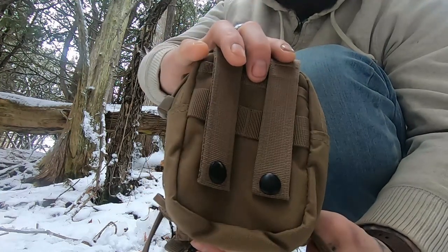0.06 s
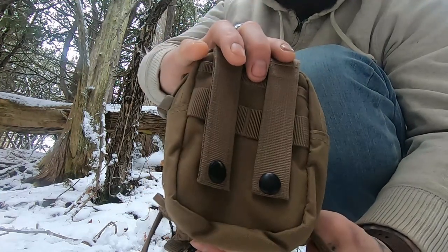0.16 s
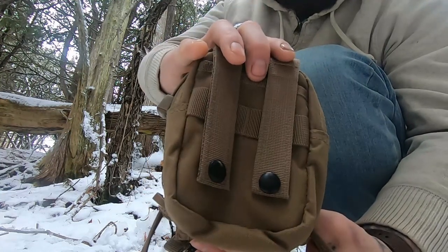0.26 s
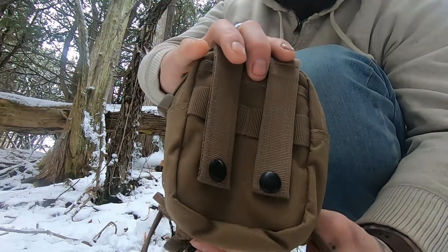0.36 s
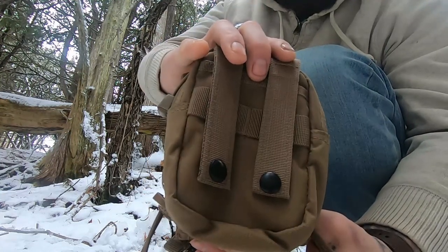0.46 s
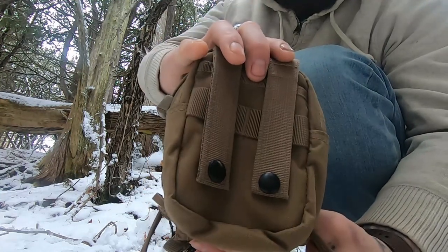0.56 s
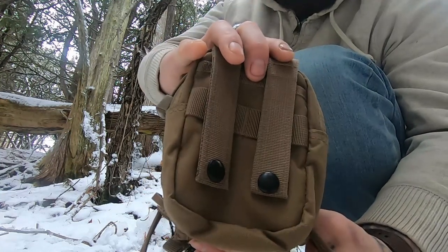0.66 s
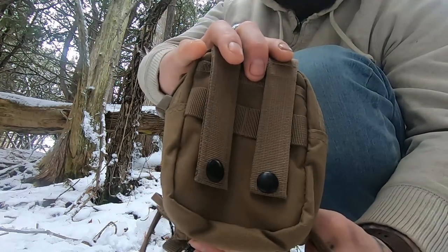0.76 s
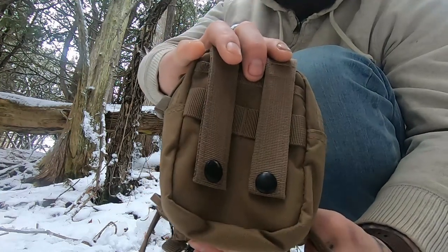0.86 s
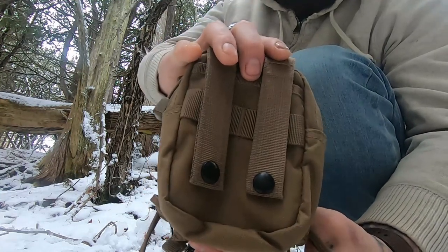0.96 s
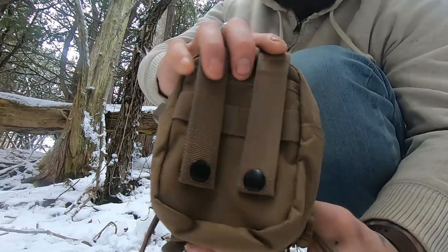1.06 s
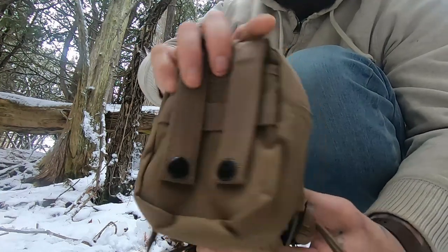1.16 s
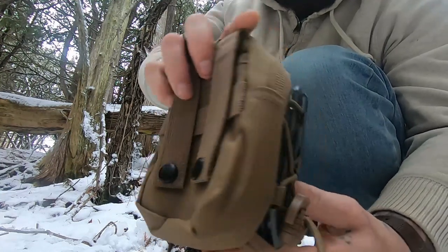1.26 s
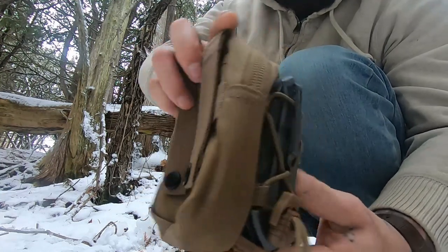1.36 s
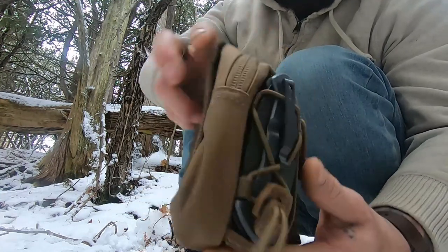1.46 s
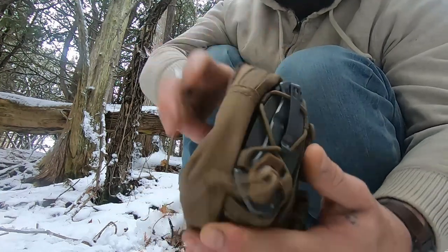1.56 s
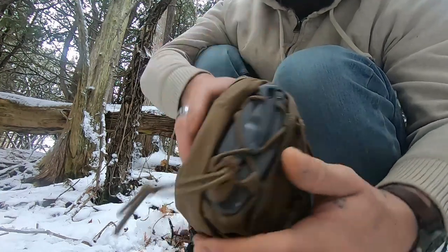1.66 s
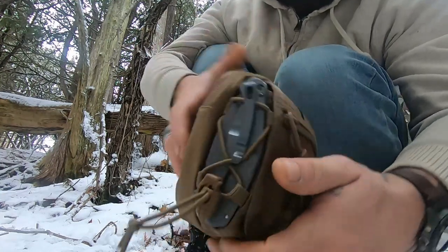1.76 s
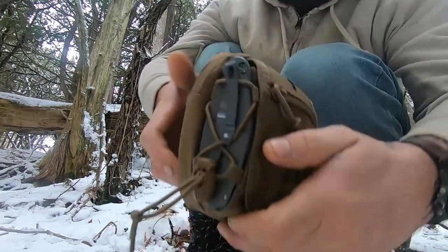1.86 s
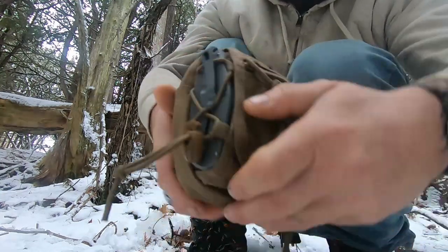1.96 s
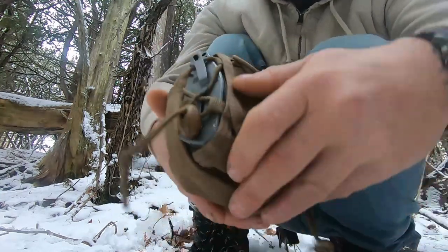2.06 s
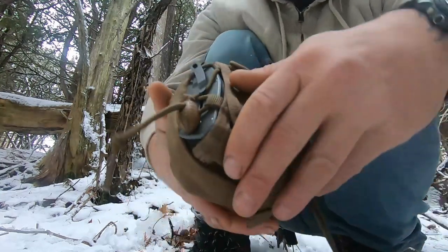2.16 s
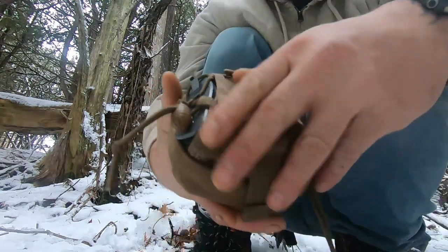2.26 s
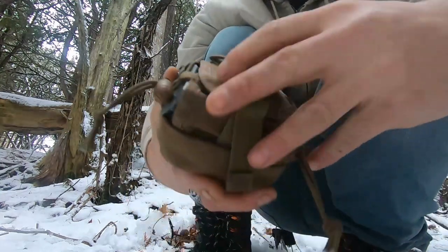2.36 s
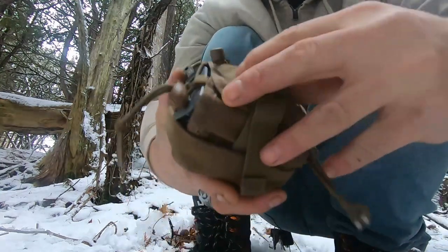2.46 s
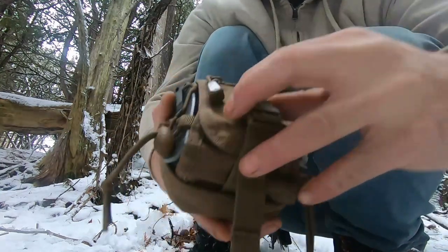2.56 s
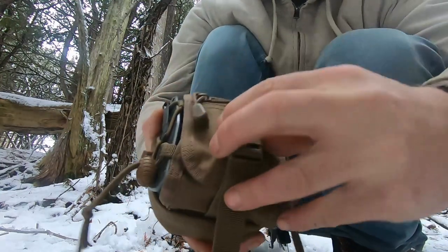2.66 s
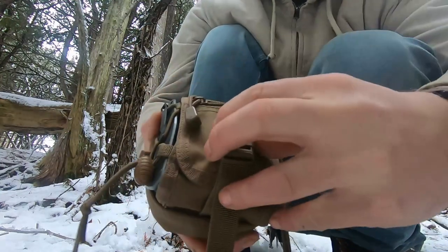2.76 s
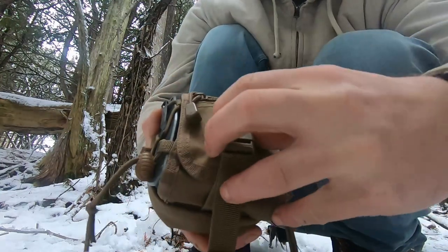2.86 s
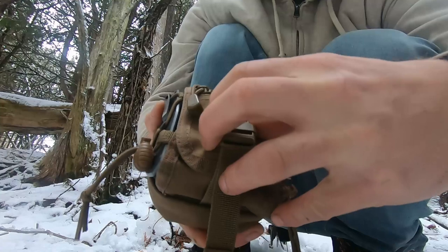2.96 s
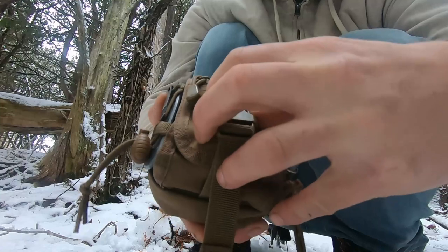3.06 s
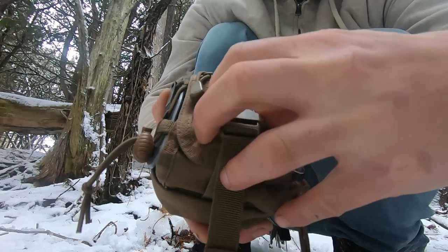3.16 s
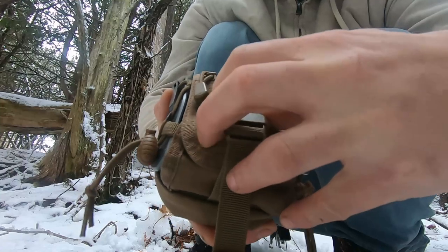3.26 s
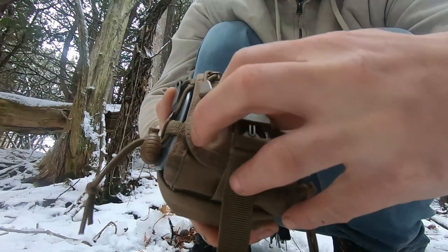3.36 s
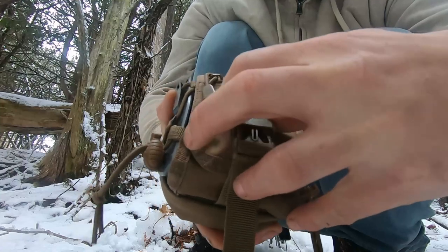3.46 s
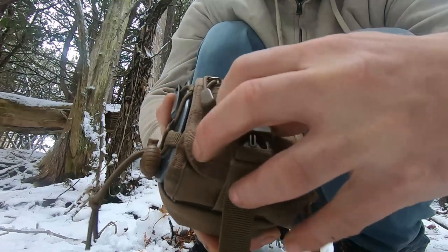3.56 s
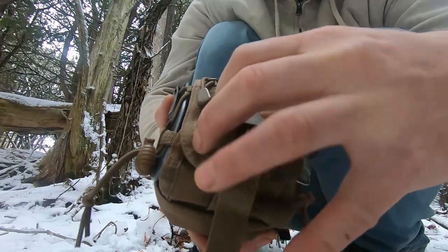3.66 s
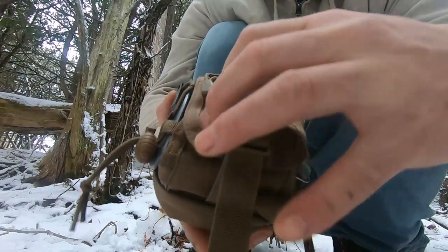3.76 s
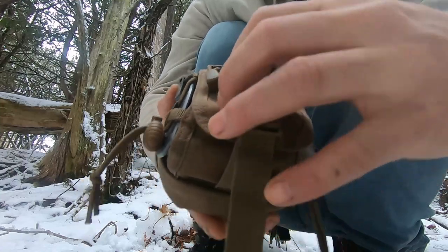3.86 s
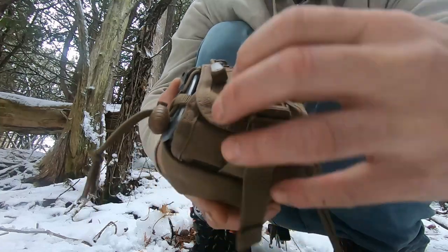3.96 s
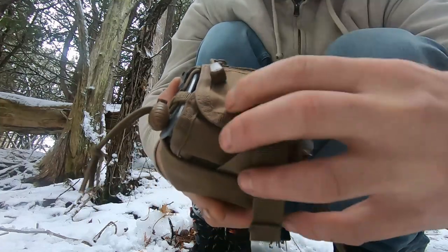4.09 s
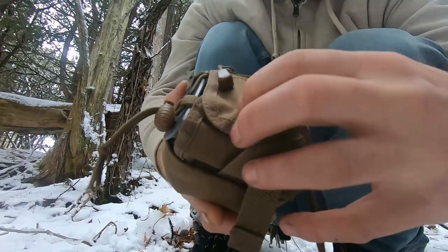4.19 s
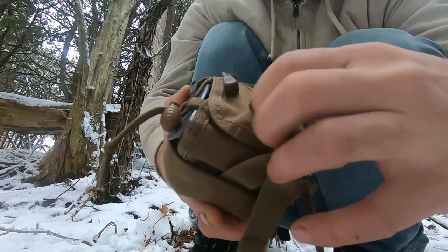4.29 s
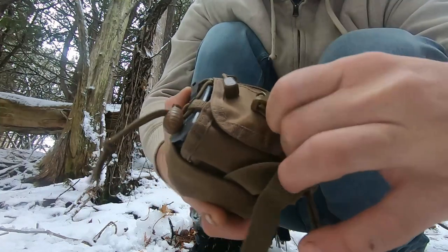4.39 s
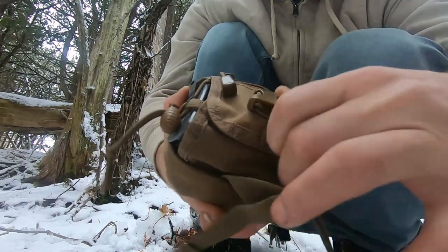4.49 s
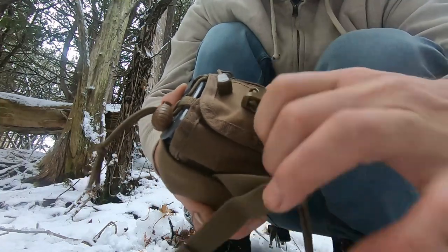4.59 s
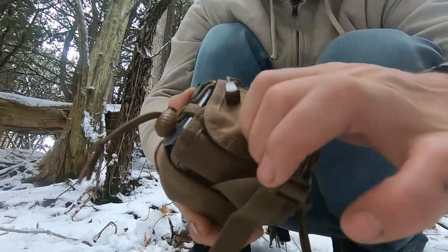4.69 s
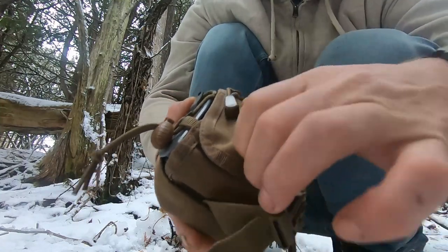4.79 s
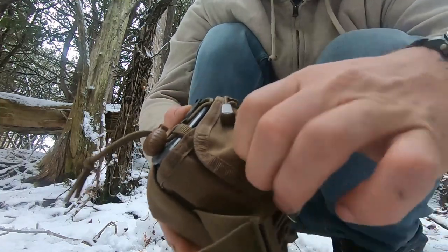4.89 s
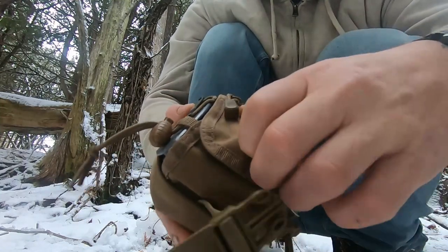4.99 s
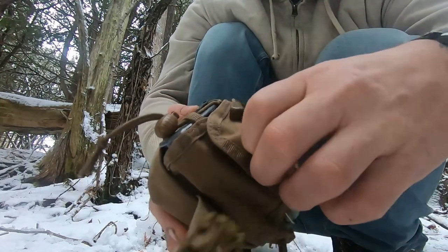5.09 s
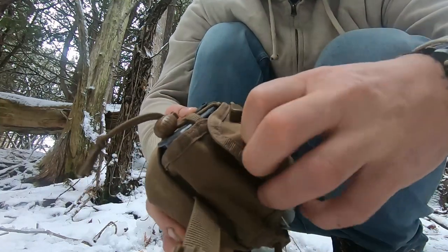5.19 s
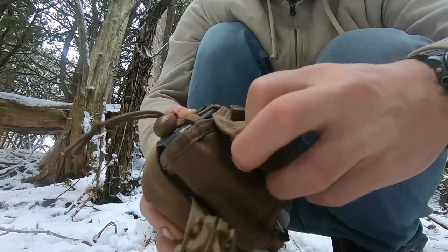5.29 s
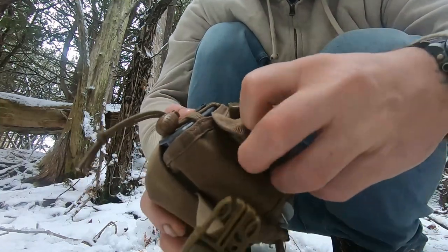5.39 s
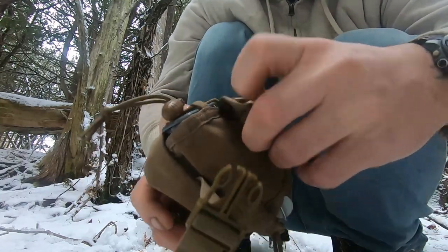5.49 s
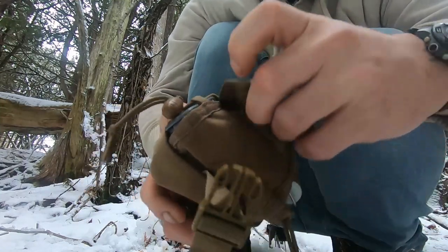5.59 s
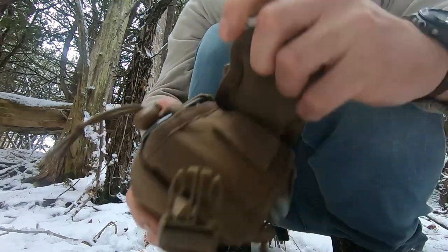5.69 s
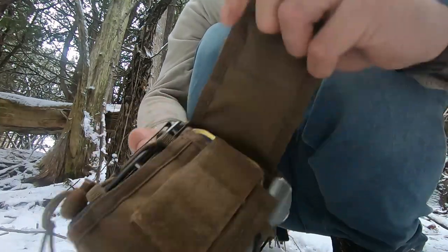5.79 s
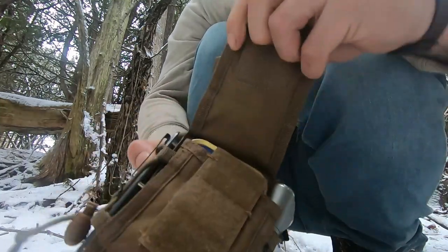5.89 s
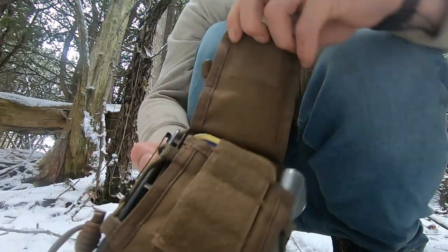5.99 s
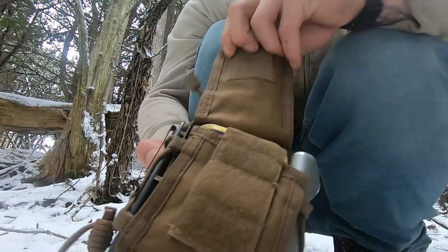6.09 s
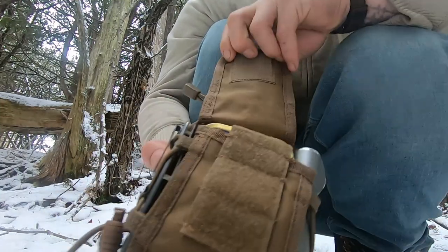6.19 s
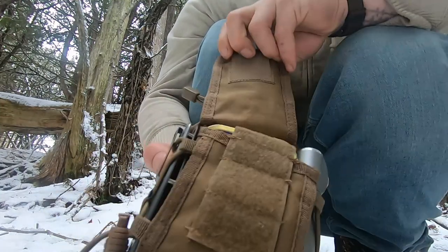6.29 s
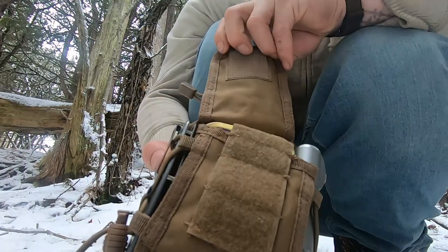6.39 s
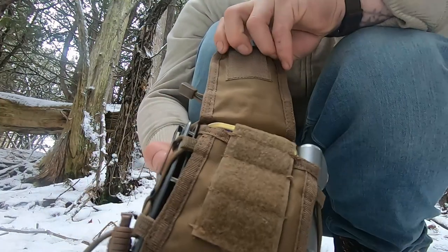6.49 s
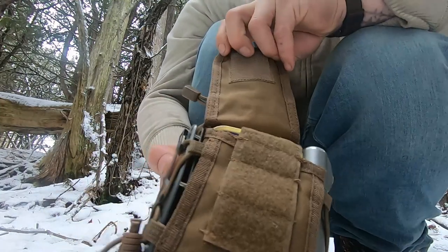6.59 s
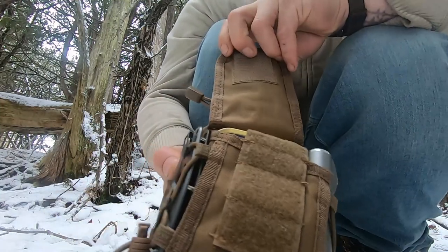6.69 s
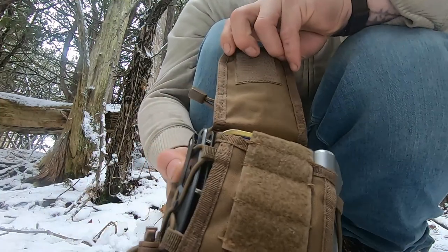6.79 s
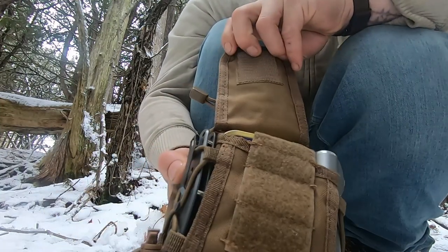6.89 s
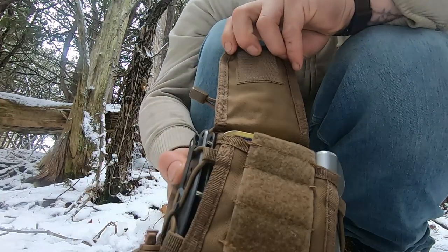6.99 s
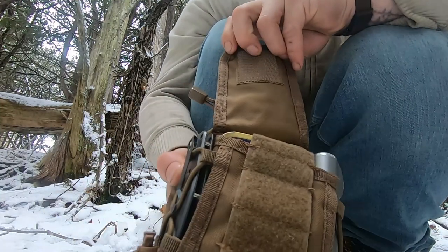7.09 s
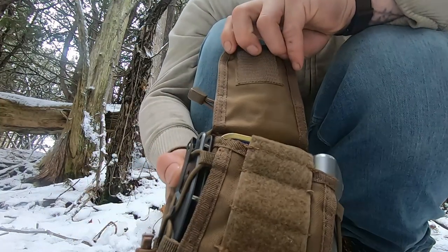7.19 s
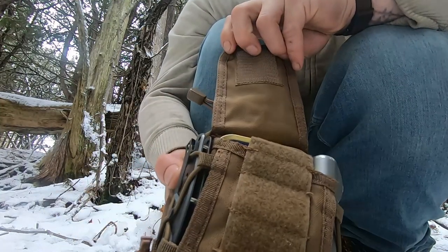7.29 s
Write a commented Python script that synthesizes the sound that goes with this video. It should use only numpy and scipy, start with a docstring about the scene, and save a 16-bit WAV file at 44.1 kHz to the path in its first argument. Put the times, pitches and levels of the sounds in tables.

```python
"""A far drone, a faint hiss and light air on the microphone are heard first, in a quiet winter wood (filtered noise).
Then a nylon belt pouch is turned over in the hands close by: its cloth swishes (grains of friction),
plastic fittings knock and a buckle snaps open (damped modes and noise bursts). A hook-and-loop flap is pulled:
single hooks pop first (short bursts), then whole rows tear in runs (dense grains through moving resonances)."""
import sys
import numpy as np
from scipy import signal
from scipy.fft import rfft, irfft, next_fast_len
from scipy.io import wavfile
from scipy.ndimage import map_coordinates

SR = 44100
rng = np.random.default_rng(int(sys.argv[2]) if len(sys.argv) > 2 else 0)


def persist_wave(psi):
    """Save psi, clipped to +-1, as 16-bit WAV."""
    counts = np.round(np.clip(psi, -1, 1) * 32767).astype(np.int16)
    wavfile.write(sys.argv[1], SR, np.atleast_2d(counts).T)


N = 323782  # length [samples]

# Spectra of cloth friction: (frequency [Hz], relative level [dB])
SWISH_SPECTRUM = [(900, -25), (1500, -5), (2000, -2), (2700, -1), (3500, 0), (4600, -9), (6000, -15.5),
                  (10000, -59)]
WEAVE_SPECTRUM = [(3000, -23), (5200, 4), (7200, 4.5), (9000, -2), (11500, -13.5), (14000, -16.5),
                  (16000, -31)]
PADDING_SPECTRUM = [(400, -25.5), (850, -2), (1100, -1.5), (1450, 1), (1900, -9), (3000, -24), (6000, -53)]
RUB_SPECTRUM = [(70, -28.5), (190, 3.5), (320, 1.5), (520, -4.5), (720, -2.5), (1200, -26), (3000, -47.5)]


def cloth():
    """Stick-slip friction: threads catch and slip under the fingers; a heavier rub also sounds the padding."""
    swish_db, weave_db, rub_db = hand_levels()
    flutter_db = 1.2 * wobble(90) + 0.7 * wobble(25)
    creases = grains(rate=90, spread_db=4)
    threads = unit(grains(rate=7000, spread_db=3) + amp(-10) * creases)
    swish = amp(swish_db + flutter_db - 1.7) * coloured(threads, SWISH_SPECTRUM)
    weave = amp(weave_db + flutter_db + 0.6) * coloured(threads, WEAVE_SPECTRUM)

    # the padding lies between swish and rub in level
    padding_db = swish_db + 0.38 * (rub_db - swish_db) - 0.8
    padding_grains = grains(rate=2500, spread_db=4.5)
    padding = amp(padding_db + flutter_db) * coloured(padding_grains, PADDING_SPECTRUM)
    rub_grains = grains(rate=660, spread_db=6.5)
    rub = amp(rub_db + flutter_db - 0.7) * coloured(rub_grains, RUB_SPECTRUM)
    return patchy(swish + weave + padding + rub, depth_db=2.2)


# Strokes of the hands over the cloth: (start [s], end [s], relative swish level [dB],
# weave hiss over swish [dB], low rub over swish [dB])
HAND_STROKES = [(1.282, 1.36, -58.5, -14.5, -16), (1.37, 1.454, -47, -13.5, -6),
                (1.475, 1.623, -46.5, -22, -20), (1.669, 1.676, -42.5, -12, -2.5),
                (1.736, 1.807, -45.5, -17, -22), (1.844, 2.235, -57.5, -11.5, -12.5),
                (2.273, 2.366, -52.5, -14, -19), (2.378, 2.458, -50.5, -11, -4.5),
                (2.497, 2.533, -42.5, -18.5, -10.5), (2.608, 2.625, -46.5, -13, -7),
                (2.675, 2.688, -44.5, -13, -11), (2.731, 2.801, -54, -4.5, -3),
                (2.889, 2.892, -44.5, -11, -11.5), (2.957, 3.467, -68.5, -10.5, -15),
                (3.177, 3.245, -56.5, -16.5, -31), (3.783, 3.931, -57.5, -18.5, -15),
                (3.991, 4.044, -53, -9.5, -35), (4.131, 4.151, -52, -11.5, 0),
                (4.209, 4.307, -52, -10, -9.5), (4.371, 4.482, -52.5, -7, -19),
                (4.537, 4.574, -46.5, -9, -1), (4.654, 4.753, -51.5, -12, -9.5),
                (4.817, 4.897, -54, -13.5, -23), (4.94, 4.964, -55.5, -6, -16),
                (5.04, 5.19, -53.5, -16.5, -16.5), (5.22, 5.37, -63, -13, -7),
                (5.385, 5.654, -51.5, -8.5, -10), (5.467, 5.561, -46.5, -13.5, -5.5),
                (5.944, 6.027, -44.5, -10, -8), (6.1, 6.315, -55, -8.5, -11.5), (6.372, 6.414, -57, -8, -7),
                (6.515, 6.583, -68.5, -22, -10.5), (6.972, 7.14, -72.5, -12.5, -9)]
STROKE_RISE_S, STROKE_FALL_S = 0.19, 0.15  # time to swell and to die by 60 dB
STROKE_ARCH_DB = 1.5  # the hand is slower at both ends of a stroke


def hand_levels():
    """Energy summation of strokes that swell, arch and die: levels of swish, weave hiss and low rub [dB]."""
    t = np.arange(0, N / SR, 0.002)
    start, end, db, weave_db, rub_db = np.transpose(HAND_STROKES)[:, :, None]
    before = np.maximum(start - t, 0)
    after = np.maximum(t - end, 0)
    position = np.clip((2 * t - start - end) / (end - start), -1, 1)  # -1 at the start, 1 at the end
    decay_db = 60 * (before / STROKE_RISE_S + after / STROKE_FALL_S)
    swish = amp(db - STROKE_ARCH_DB * position ** 2 - decay_db)
    layers = [np.linalg.norm(swish * amp(over_db), axis=0) for over_db in (0, weave_db, rub_db)]
    return [np.interp(np.arange(N) / SR, t, 20 * np.log10(layer + 1e-6)) for layer in layers]


# Nominal modes of the filled pouch, plastic shell and prongs:
# (frequency [Hz], relative level [dB], 60 dB decay time [s])
POUCH_MODES = [(180, -2.5, 0.027), (292.5, 2.5, .025), (462, 2, 0.011)]
SHELL_MODES = [(644, -17.5, 0.01), (880, -4.5, 0.01), (1310, 1.5, 0.008), (1493, 1.5, .013),
               (2020, -5.5, 0.012)]
PRONG_MODES = [(2180, -6, 0.0072), (2590, 3.5, 0.014), (3022, 1.5, 0.0099)]
# Spectrum of the plastic's crack: (frequency [Hz], relative level [dB])
CRACK_SPECTRUM = [(1500, -33.5), (3000, -10), (4000, -9), (5200, -7.5), (7000, -7.5), (9000, -14.5),
                  (13000, -32.5), (16000, -30.5)]
SMACK_DB = -7  # stiff cloth jolted by each knock, relative to its ring, before the shell's share


def fittings():
    """Impact excitation of damped modes: plastic slides, then strikes with crack, ring, thud and cloth smack."""
    rings, cracks, smacks = np.zeros((3, 2, N))
    t = np.arange(SR // 12) / SR
    for s, thud_db, ring_db, prong_share, crack_db in knocks():
        prong_share = np.clip(prong_share, 0, 1)
        shell_gain = np.sqrt(1 - prong_share)
        plastic = shell_gain * ring(SHELL_MODES, t) + np.sqrt(prong_share) * ring(PRONG_MODES, t)
        add(rings, s, amp(thud_db) * ring(POUCH_MODES, t) + amp(ring_db) * plastic)

        # a time-reversed burst swells up to the strike
        slide = burst(t, t60=0.018, tail_db=-18, tail_t60=0.0395)[:, ::-1]
        add(cracks, s - t[-1], amp(crack_db - 11) * slide)
        crack = burst(t, t60=0.009, tail_db=-23, tail_t60=0.035)
        add(cracks, s, amp(crack_db) * crack)
        smack = burst(t, t60=0.0078, tail_db=-23.5, tail_t60=0.04)
        add(smacks, s, amp(ring_db + SMACK_DB) * shell_gain * smack)
    return rings + coloured(cracks, CRACK_SPECTRUM) + coloured(smacks, FLAP_SPECTRUM)


# Plastic buckle and fittings clicking:
# (time [s], ring level [dB], share of the prongs [0-1], crack over ring [dB])
BUCKLE_CLICKS = [(1.6043, -45.5, 0.68, -20), (1.8253, -33.5, 0.99, -32), (2.3892, -41, 0.45, -21),
                 (2.7898, -47.5, .4, 3), (2.8286, -47.5, .1, -13), (2.891, -49, 0.2, -5),
                 (3.5865, -27, 0.03, -4), (3.8008, -52.5, 0.67, -15), (3.868, -52.5, 0.7, -18),
                 (4.4713, -32.5, 0.94, -15), (4.535, -31, 0.52, -12), (4.539, -25, 0, -4),
                 (4.7499, -36.5, 0.92, -15.5), (4.947, -52, .1, -11), (5.3785, -21.5, 0.5, -10.5),
                 (5.4576, -39, 0.3, -16), (5.9526, -29.5, 0.06, -5.5), (6.002, -31.5, 0.43, -15.5),
                 (6.251, -47, 0.36, -20), (7.035, -63, 0.48, -11.5)]
# Fingertips and cord bumping the filled pouch: (time [s], thud level [dB])
SOFT_BUMPS = [(1.4318, -48), (1.678, -50), (1.8252, -53), (1.846, -50.5), (1.883, -47), (1.99, -47.5),
              (4.6479, -47.5), (5.0567, -42), (6.0635, -44.5), (6.3134, -51), (6.4337, -55.5)]
THUD_DB, THUD_GROWS = -22, 0.75  # thud under a 0 dB click [dB]; dB gained per dB of click
BUMP_RING_DB, BUMP_CRACK_DB = -3, -14  # soft contact: relative to the thud
TICKS_PER_S = 8
TICK_DB, TICK_SPREAD_DB = 0.5, 3.5  # mean and +/- range, relative to the swish that stirs the fittings


def knocks():
    """Contact hardness sets the balance of hard clicks, soft bumps and random ticks that follow the swish.

    Gives (time [s], thud [dB], ring [dB], prong share [0-1], crack [dB])."""
    clicks = [(s, THUD_DB + THUD_GROWS * db, db, share, db + crack_db)
              for s, db, share, crack_db in BUCKLE_CLICKS]
    bumps = [(s, db, db + BUMP_RING_DB, 0.2, db + BUMP_CRACK_DB) for s, db in SOFT_BUMPS]
    swish_db = hand_levels()[0]
    ticks = []
    first, last = HAND_STROKES[0][0], HAND_STROKES[-1][1]
    for when, size, share in rng.random((round(TICKS_PER_S * (last - first)), 3)):
        s = first + when * (last - first)
        db = swish_db[round(s * SR)] + TICK_DB + TICK_SPREAD_DB * (2 * size - 1)
        ticks.append((s, db - 5.5, db, share, db - 10))
    return clicks + bumps + ticks


# The strongest tufts of hooks letting go: (time [s], relative level [dB])
TUFT_POPS = [(5.5296, -26), (5.534, -32.5), (5.5438, -36), (5.5917, -36.5), (5.6122, -28.5),
             (5.6298, -28.5), (5.6548, -29.5), (5.6617, -25), (5.6803, -21.5), (5.6918, -25.5),
             (5.7016, -28.5), (5.7134, -30.5), (5.7297, -22), (5.7651, -27.5), (5.7967, -28.5),
             (5.8042, -27.5), (5.8182, -24.5)]
# Spectrum of a plucked tuft: (frequency [Hz], relative level [dB])
TUFT_SPECTRUM = [(60, -22), (220, -10), (600, -17), (850, -12), (1300, 0), (1550, -1), (1950, -6),
                 (2900, 3), (5200, -4), (7700, -3), (9000, -17), (13000, -23), (16000, -34)]
NEIGHBOUR_S, NEIGHBOUR_DB = 0.0025, -6.5  # mean delay and relative level of the neighbour dragged loose


def hook_pops():
    """Sudden release of stored strain: tufts pop singly, each plucking the taut flap and freeing a neighbour."""
    plucks = np.zeros((2, N))
    t = np.arange(SR // 20) / SR
    for s, db in TUFT_POPS:
        neighbour_delay = NEIGHBOUR_S * (0.5 + rng.random())
        for delay, drop_db in (0, 0), (neighbour_delay, NEIGHBOUR_DB):
            pop = burst(t, t60=0.005, tail_db=-16, tail_t60=0.016)
            add(plucks, s + delay, amp(db + drop_db) * pop)
    return amp(1.5) * coloured(plucks, TUFT_SPECTRUM)


# Runs of tearing: (start [s], end [s], relative hook level [dB])
TEARING_RUNS = [(5.654, 5.729, -33), (5.721, 5.779, -24), (5.791, 5.825, -35), (5.822, 5.947, -20)]
# How loose the flap hangs: (time [s], share [0-1])
FLAP_FREED = [(5.82, 0), (5.875, 0.89)]
# Spectra of the hooks and of the flap, which also colours the cloth smacks: (frequency [Hz], relative level [dB])
HOOK_SPECTRUM = [(1000, -22), (1500, -11), (2000, -7), (2600, 0), (3300, -6), (4000, -5), (5300, -8),
                 (7100, -5), (9000, -13), (13000, -23), (16000, -37)]
FLAP_SPECTRUM = [(50, -21), (120, -10), (200, -6), (450, -14), (720, -9), (950, -3), (1500, 0), (1800, -2),
                 (2200, -1), (2600, -4), (3200, -20), (6000, -50)]
TAUT_HZ, LOOSE_HZ = 3700, 2650  # resonance of the hook strip, held and freed
LOOSE_RING_DB = -5.5  # the slack strip rings less
DRUM_TAUT_DB, DRUM_LOOSE_DB = -8, -1.5  # gain of the flap's drumming, held and freed


def tearing():
    """Avalanche release of hook rows: the strip's resonance falls as it comes free and the flap drums along."""
    t = np.arange(N) / SR
    hooks, flap = np.zeros((2, 2, N))
    avalanches = unit(amp(2.3 * wobble(380) + 1.5 * wobble(120)))
    tugs = grains(rate=6000, spread_db=2)
    for start, end, hooks_db in TEARING_RUNS:
        onset = np.clip((t - start) / 0.0015, 0, 1)
        release = amp(-60 * np.clip(t - end, 0, 0.1) / 0.022)
        pull = avalanches * onset * release
        # a slow peel is a sparse crackle, a hard pull frees thousands of hooks a second
        hooks += amp(hooks_db) * pull * grains(rate=90000 * amp(hooks_db), spread_db=2)
        flap += amp(hooks_db) * pull * tugs

    freed = np.clip(np.interp(t, *np.transpose(FLAP_FREED)), 0, 1)
    taut, loose = [signal.lfilter(*signal.iirpeak(hz, 3, SR), hooks) for hz in (TAUT_HZ, LOOSE_HZ)]
    strip = (1 - freed) * taut + freed * amp(LOOSE_RING_DB) * loose
    drum_db = DRUM_TAUT_DB + freed * (DRUM_LOOSE_DB - DRUM_TAUT_DB)
    drumming = coloured(amp(drum_db) * flap, FLAP_SPECTRUM)
    return amp(-3) * coloured(hooks + strip, HOOK_SPECTRUM) + drumming


# Echo among the trunks: (frequency [Hz], 60 dB decay time [s])
WOOD_DECAY = [(200, 0.3), (2000, 0.14), (10000, 0.17)]


def trunks(x):
    """Diffuse scattering: convolution with decaying noise gives an echo from the trees, left and right."""
    hz, t, z = signal.stft(rng.standard_normal((2, SR // 2)), SR, nperseg=256)
    decay = amp(-60 * t / along(WOOD_DECAY, hz)[:, None])
    tail = signal.istft(z * decay, SR, nperseg=256)[1]
    return signal.fftconvolve(x[None], tail / np.linalg.norm(tail[0]), axes=1)[:, :N]


# Spectra of the surroundings: (frequency [Hz], relative level [dB])
DRONE_SPECTRUM = [(40, -24), (110, -13.5), (140, -1), (170, 3), (205, -2.5), (260, -12.5), (350, -19),
                  (560, -29), (780, -17.5), (930, -26), (1150, -23.5), (1800, -29), (2700, -47),
                  (6000, -63.5)]
AIR_SPECTRUM = [(15, -1.5), (40, -2), (70, -1.5), (110, -6), (200, -26), (600, -57)]
HISS_SPECTRUM = [(1000, -7.5), (3500, 1.5), (6200, -5), (7300, 5), (8700, 0.5), (10200, -11),
                 (16000, -21.5)]


def background():
    """Modulated broadband noise: a far drone, air stirring at the microphone and a faint flickering hiss."""
    fade_db = np.interp(np.arange(N) / SR, [0, 3, 6.5], [0, -0.5, -4])
    eddies_db = 3 * wobble(14)
    drone = amp(-59.5 + fade_db + 1.2 * wobble(26)) * coloured(noise(), DRONE_SPECTRUM)
    air = amp(-62.5 + fade_db + eddies_db) * coloured(noise(), AIR_SPECTRUM)
    hiss = amp(-82 + 1.4 * wobble(8.7)) * coloured(noise(), HISS_SPECTRUM)
    return drone + air + hiss


def ring(modes, t, detune=0.05):
    """Modal synthesis: the grip shifts pitch and strength at every knock; each mode leads at one port."""
    hz, db, t60 = np.transpose(modes)[:, :, None]
    phase = 2 * np.pi * hz * np.exp(detune * rng.standard_normal(hz.shape)) * t
    sign = (-1) ** np.arange(len(modes))[:, None]
    swing = sign * amp(db + 2 * rng.standard_normal(hz.shape) - 60 * t / t60)
    mid = np.sum(swing * np.sin(phase), axis=0)
    # the quadrature part in the side signal sets the lead; it grows in over half a cycle
    lead = rng.standard_normal(hz.shape) * np.cos(phase) * np.minimum(phase / np.pi, 1)
    side = np.sum(swing * lead, axis=0)
    return equal_energy(np.array([mid, side]))


def burst(t, t60, tail_db, tail_t60):
    """Two-stage exponential decay: a sharp spray of slips with a weaker rattle after it."""
    envelope = amp(-60 * t / t60) + amp(tail_db - 60 * t / tail_t60)
    return equal_energy(envelope * rng.standard_normal((2, len(t))))


def grains(rate, spread_db):
    """Poisson-like impulses: rate a second per row, uneven in size, mid and side, joint rms 1."""
    size = amp(spread_db * np.clip(rng.standard_normal(N), -2, 2))
    return unit((rng.random(N) < rate / SR) * size * noise())


def patchy(x, depth_db):
    """Time-varying filtering: shifting folds of fabric favour now one band, now another."""
    z = signal.stft(x, nperseg=512)[2]
    smoothing = np.outer(np.hanning(10), np.hanning(16))
    field = signal.fftconvolve(rng.standard_normal(z.shape[1:]), smoothing, "same")
    return signal.istft(z * unit(amp(depth_db * unit(field))), nperseg=512)[1][:, :N]


def coloured(x, spectrum, size=4096):
    """Minimum-phase filtering: two rows through a causal filter of unit energy."""
    cepstrum = irfft(np.log(amp(along(spectrum, np.fft.rfftfreq(size, 1 / SR)))))
    # folding the cepstrum makes the filter causal
    cepstrum[1:size // 2] *= 2
    cepstrum[size // 2 + 1:] = 0
    kernel = irfft(np.exp(rfft(cepstrum)))
    return signal.fftconvolve(x, kernel[None] / np.linalg.norm(kernel), axes=1)[:, :N]


def filtered(x, response):
    """Zero-phase filtering: the spectrum of x times a response of frequency."""
    m = next_fast_len(N + SR // 2)
    return irfft(rfft(x, m) * response(np.fft.rfftfreq(m, 1 / SR)), m)[..., :N]


def wobble(rate):
    """Band-limited modulation: a smooth random curve, rate knots a second."""
    return map_coordinates(rng.standard_normal(int(N * rate / SR) + 4), [np.arange(N) * rate / SR])


def noise():
    """Uncorrelated white noise for mid and side."""
    return rng.standard_normal((2, N))


def equal_energy(x):
    """Energy normalisation: each row of a short sound has the energy of 10 ms at rms 1."""
    return x / np.linalg.norm(x, axis=-1, keepdims=True) * np.sqrt(SR / 100)


def add(track, s, sound):
    """Linear superposition: mix a short sound in at time s [s]."""
    track[:, round(s * SR):][:, :sound.shape[1]] += sound


def amp(db):
    """Decibel definition: level [dB] to amplitude ratio."""
    return 10 ** (np.asarray(db) / 20)


def unit(x):
    """Power normalisation to rms 1."""
    return x / np.sqrt(np.mean(x ** 2) + 1e-20)


def along(points, hz):
    """Logarithmic frequency scale: interpolate (frequency [Hz], value) points."""
    f, v = np.transpose(points)
    return np.interp(np.log(hz + 1), np.log(f + 1), v)


def ports(x, width):
    """Mid-side decoding: mid and width-filtered side become left and right."""
    side = filtered(x[1], lambda hz: amp(along(width, hz)))
    return np.array([x[0] + side, x[0] - side])


# Stereo width of the near pouch and of the surroundings: (frequency [Hz], gain of side over mid [dB])
POUCH_WIDTH = [(60, -11), (200, -14), (1200, -13), (3000, -15), (5500, -10), (8500, -2.5), (12000, -5)]
BACKGROUND_WIDTH = [(60, -11.5), (200, -13), (700, 4.5), (2400, -0.5), (8000, 0)]


def scene():
    """Superposition of sources: the pouch straight ahead, wider in its treble, amid echo and background."""
    pouch = cloth() + fittings() + patchy(hook_pops() + tearing(), depth_db=2)
    echo = amp(-28) * trunks(pouch[0])
    return ports(pouch, POUCH_WIDTH) + echo + ports(background(), BACKGROUND_WIDTH)


TOP_HZ = 15300  # upper band limit


def record(dry):
    """Soft saturation rounds off the highest peaks; a steep low-pass then limits the band."""
    rounded = dry / (1 + (dry / 0.55) ** 4) ** (1 / 4)
    return filtered(rounded, lambda hz: 1 / (1 + (hz / TOP_HZ) ** 120))


dry = scene()
out = record(dry)
persist_wave(out)
```